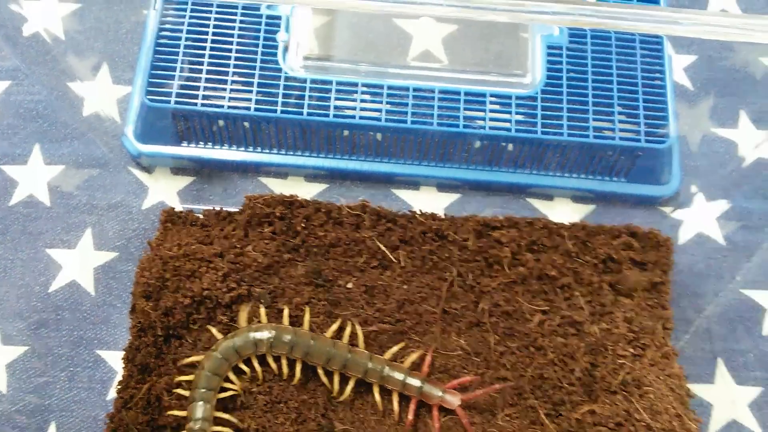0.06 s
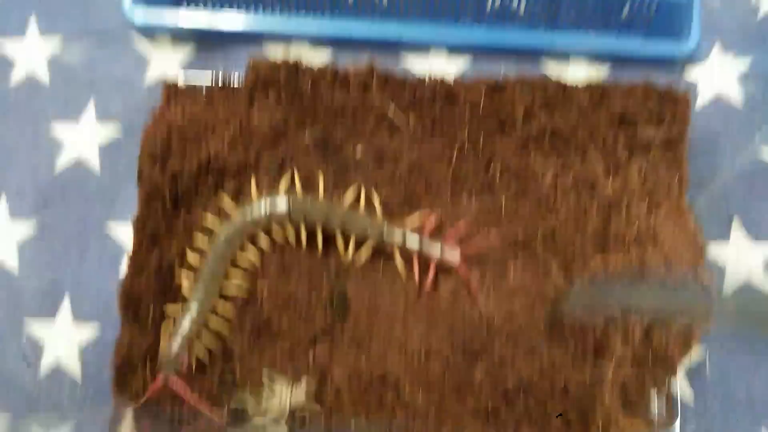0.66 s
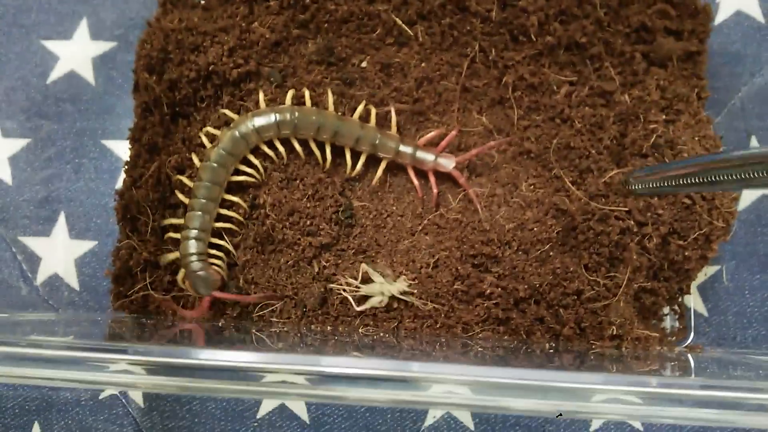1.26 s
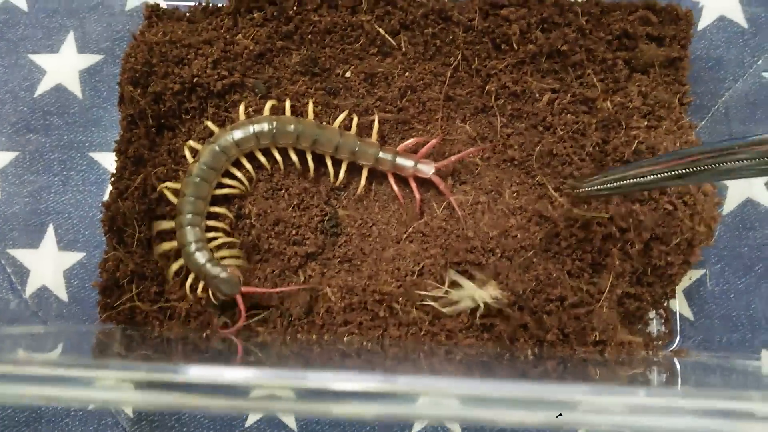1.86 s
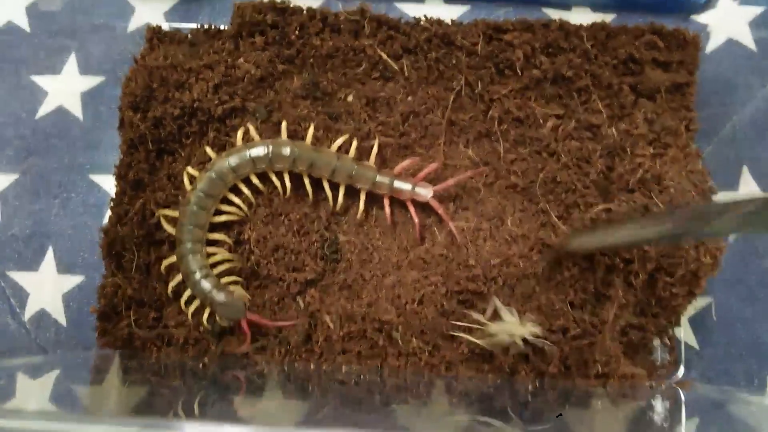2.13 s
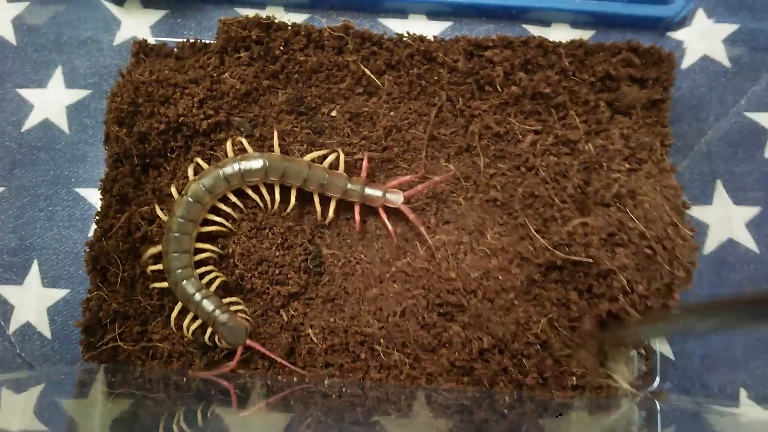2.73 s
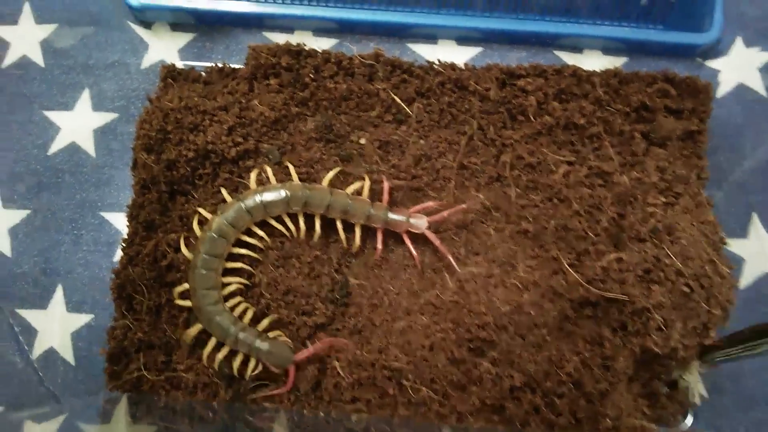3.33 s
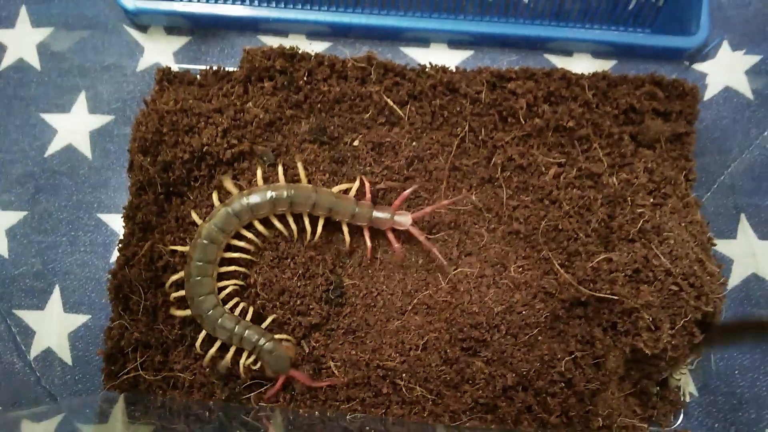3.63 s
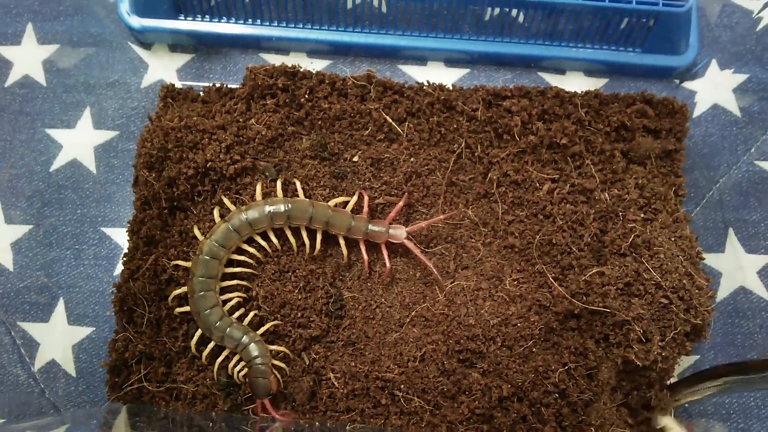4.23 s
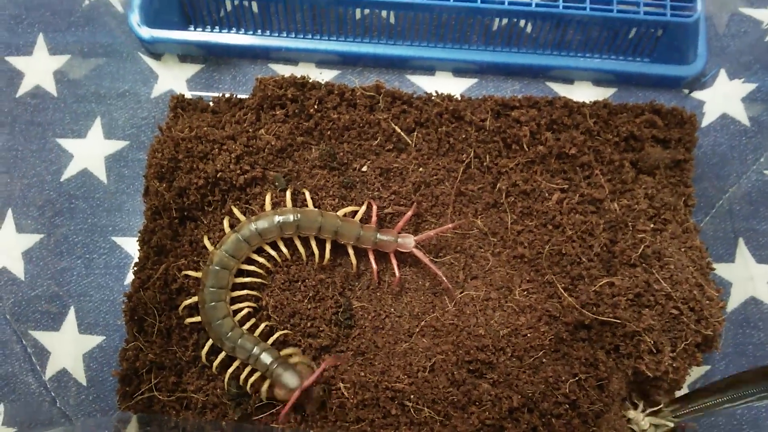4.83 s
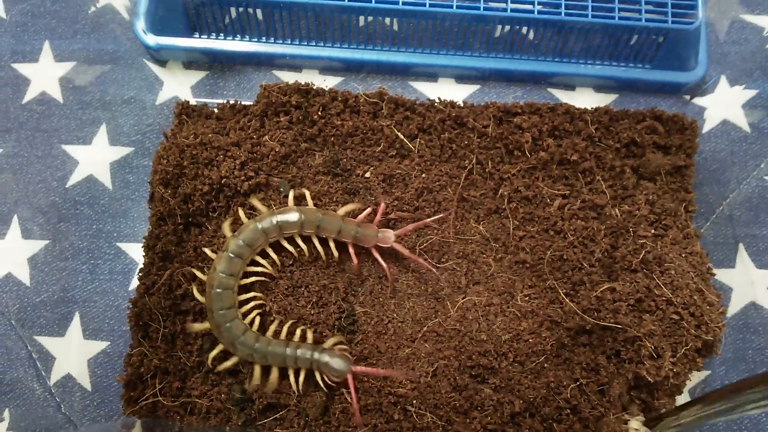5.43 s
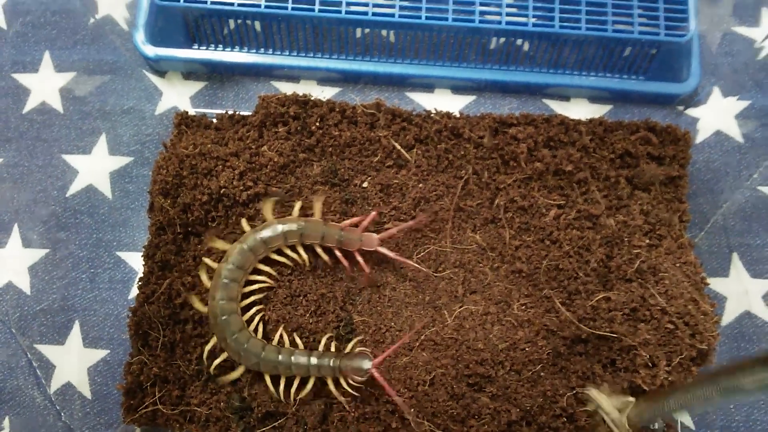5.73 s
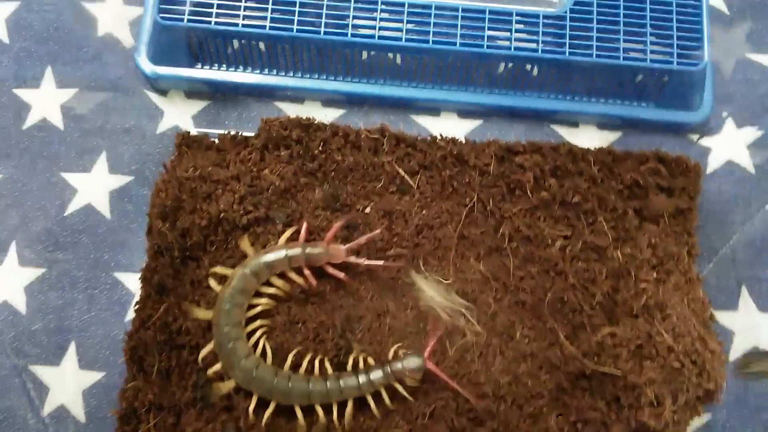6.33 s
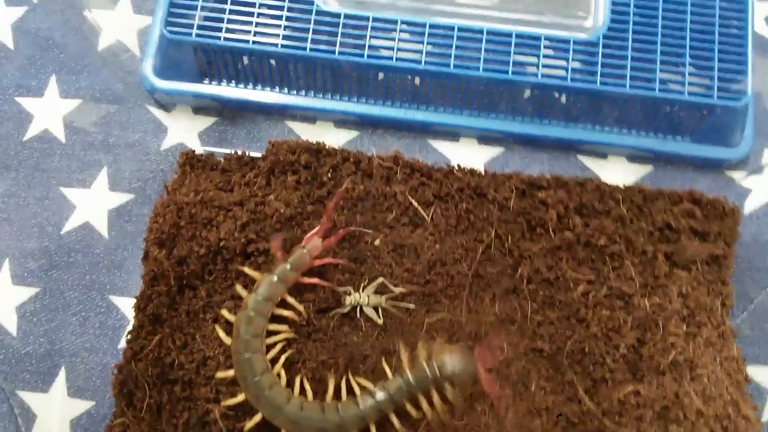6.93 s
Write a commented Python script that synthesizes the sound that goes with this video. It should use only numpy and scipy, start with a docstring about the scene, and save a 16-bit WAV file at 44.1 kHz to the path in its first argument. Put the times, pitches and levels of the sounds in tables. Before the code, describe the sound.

Close to the microphone in a small room, soft handling rumble and a few dull scuffs come first. Long steel tongs then knock three times on a thin plastic tub, each blow ringing briefly and hollowly. They scrape and tick along the wall and tap twice lightly. After a pause they hit the rim hard and bounce in a quick rattle. A faint low hum and hiss lie underneath.

```python
"""Long steel tongs chase a cricket into the corner of a thin plastic tub lined with soil, close to the
microphone in a small room. Each blow rings the plastic, among short scrapes, ticks and buzzes.
The tongs knock, judder along the wall, tap twice, then strike the rim and bounce ever faster as they
are drawn out. Underneath lie soft handling rumble, room noise with faint hollow tones,
a few scuffs further off, a low hum and faint hiss that wells up after sharp sounds."""
import sys
import numpy as np
from scipy import signal
from scipy.fft import rfft, irfft, next_fast_len
from scipy.io import wavfile
from scipy.ndimage import uniform_filter1d, map_coordinates

SR = 44100
rng = np.random.default_rng(int(sys.argv[2]) if len(sys.argv) > 2 else 0)


def generate_wav(sig):
    """Save sig (samples, or channels by samples) to the path in sys.argv[1] as 16-bit PCM at SR."""
    pcm = np.round(np.clip(np.atleast_2d(sig).T, -1, 1) * 32767).astype(np.int16)
    wavfile.write(sys.argv[1], SR, pcm)


N = 317079

# Handling rumble and room noise over time. Each row: time in seconds, relative level in dB.
RUMBLE_LEVELS = [(0, -56), (0.6, -59), (2.8, -56.5), (4.7, -59.5), (5.05, -64), (6.15, -71), (6.55, -66),
                 (7.19, -68.5)]
AIR_LEVELS = [(0, -60), (1.5, -66.5), (2.4, -65), (4.5, -63.5), (5.1, -71.5), (7.19, -69)]
# The hand shifts its grip. Each row: middle in seconds, length in seconds, relative level in dB.
GRIP_SHIFTS = [(0.22, .35, -55), (0.62, .1, -54), (1.47, .2, -54), (1.87, .1, -53), (2.36, .1, -56),
               (5.82, .35, -62)]
# Colours of the noises. Each row: frequency in Hz, relative density in dB.
RUMBLE_SPECTRUM = [(20, -27), (50, -23), (100, -17.5), (130, 0.5), (175, -6), (230, -8.5), (320, -16.5),
                   (500, -42), (1000, -49)]
AIR_SPECTRUM = [(150, -10.5), (330, -0.5), (500, -0.5), (750, -4), (920, -1), (1150, -11.5), (2000, -22.5),
                (3500, -29.5), (8000, -42)]
HISS_SPECTRUM = [(300, -3), (2000, 3), (5000, -3.5), (8500, 1), (12000, -0.5), (15500, -7)]
SCUFF_SPECTRUM = [(300, -46), (750, -7), (950, 10), (1250, -0.5), (1600, 0), (2600, -5), (3500, -30),
                  (9000, -33)]
CRACK_SPECTRUM = [(40, -47), (100, -18), (170, -3), (330, -3), (750, -4), (1200, -4.5), (2200, -4),
                  (4500, 0), (8000, -3), (11000, -3.5), (16000, -8)]  # the tub's crowd of short, overlapping modes
# Decay of the crack and of the room. Each row: frequency in Hz, time to fall 60 dB in seconds.
CRACK_DECAY = [(200, 0.14), (1500, 0.11), (3500, .06), (7000, 0.031), (15000, .032)]
ROOM_DECAY = [(150, 0.33), (600, .32), (2000, .28), (4000, .24), (7000, 0.28), (12000, .45)]
# Narrow bands of noise. Each row: middle in seconds, length in seconds, pitch in Hz, level in dB.
HOLLOW_TONES = [(0.378, 0.36, 894, -60), (4.284, 0.61, 352, -56.5), (5.304, 0.44, 440, -68),
                (5.701, 0.65, 378, -66.5)]
# Scuffs further off. Each row: start in seconds, level in dB, time to fall 60 dB in seconds.
FAR_SCUFFS = [(0.942, -67, 1), (1.17, -65.5, .5), (1.44, -62.5, 1), (1.821, -43, 0.28),
              (6.725, -57.5, 0.25)]
# Modes of the tub. Each row: frequency in Hz, nominal time to fall 60 dB in seconds, then strength in dB
# when struck at each of the PLACES.
TUB_MODES = [(201.6, 0.14, -40, -39, -28, -28), (219.4, 0.24, -27.5, -24, -42, -31.5),
             (267, 0.16, -31.5, -53, -37, -38), (310, 0.13, -34.5, -62, -37.5, -38.5),
             (406, 0.22, -28.5, -45, -29.5, -25.5), (430.6, 0.3, -21, -20, -34.5, -34.5),
             (479.4, 0.08, -20, -12, -21.5, -29.5), (517, 0.18, -30.5, -17.5, -18.5, -40.5),
             (564.5, 0.14, -25, -19.5, -32.5, -23), (633.6, 0.14, -22, -43, -36, -21),
             (685.5, 0.15, -28, -23.5, -24, -28.5), (895, 0.24, -37.5, -24, -16.5, -25),
             (966, 0.053, -10.5, -20, -31, -11), (981, 0.19, -28.5, -29, -27, -18.5),
             (1040, 0.11, -27.5, -46, -16.5, -28), (1160, 0.12, -27, -21.5, -33, -28),
             (1255, 0.13, -40, -26, -24, -41), (1613, 0.085, -22, -22, -32, -36.5),
             (1736, 0.119, -29.5, -23.5, -26, -28.5), (1885, 0.058, -25.5, -37, -27, -34),
             (2026, 0.078, -37, -35, -27.5, -33.5), (2250, 0.09, -25, -21, -30.5, -25.5),
             (2393, 0.07, -24, -40, -21, -22.5), (3077, 0.1, -27, -29, -31.5, -36.5),
             (3530, 0.032, -26.5, -39, -35, -24.5), (3740, 0.094, -24.5, -38, -29, -17),
             (4700, 0.033, -38.5, -43.5, -29, -29.5), (5070, 0.03, -28, -40, -29.5, -31.5),
             (5527, 0.05, -23, -39, -34.5, -28), (6430, 0.022, -42.5, -39, -30.5, -36.5),
             (8347, 0.041, -44.5, -27, -35.5, -18.5)]
PLACES = ["wall", "bottom", "corner", "rim"]
# Tongs strike the tub. Each row: start in seconds, place, relative level in dB, treble cutoff in Hz,
# extra crack in dB, ring length factor, seconds to the first rebound (0 for none), dB change per rebound.
TONG_BLOWS = [(2.654, "wall", 3, 4530, -1.5, 0.72, .008, -3),
              (2.9715, "bottom", -7.5, 2200, -0.5, 0.75, 0, 0.00022),
              (3.4976, "corner", 0.8, 15050, 3.5, 1.05, 0, 0),
              (4.702, "corner", -28, 1200, 1, 0.82, .017, -2),
              (4.7914, "corner", -19.5, 3100, 4.5, 0.6, .019, -2),
              (6.417, "rim", 5.3, 8990, -0.3, 0.5, .0316, -5),
              (6.526, "rim", -16, 1000, 2.5, .3, 0, 0.00034)]
# Short scrapes, thin ticks of the steel tips, and brief buzzes after blows. Each row: start in seconds,
# length in seconds, relative level in dB, bass cutoff in Hz, treble cutoff in Hz.
SCRAPES_AND_TICKS = [(2.712, .058, -43, 300, 1400), (3.822, 0.025, -47.5, 250, 2400),
                     (3.872, .021, -36.5, 550, 6800), (3.962, 0.035, -42, 220, 4300),
                     (4.02, .06, -37.5, 560, 2900), (4.171, .006, -53, 400, 2000),
                     (4.218, 0.0087, -50.5, 5850, 14800), (4.276, .01, -57, 700, 2000),
                     (4.314, 0.0097, -55.5, 6000, 14000), (4.326, 0.0071, -44.5, 683, 1200),
                     (4.344, .048, -52, 690, 1500), (4.703, .022, -48.5, 500, 1300),
                     (6.492, .022, -34, 500, 1000)]
# Resonances of the tongs pressed on plastic. Each row: frequency in Hz, width in Hz, strength in dB.
TONG_MODES = [(445.3, 30, 6), (990, 37, 1), (1210, 74, -9.5), (1460, 37, -5.5), (1690, 58, 1),
              (1956, 52, 1.5), (2300, 130, -2.5), (2930, 180, -11.5), (3560, 81, -8.5), (3920, 140, -8.5),
              (4410, 85, -8.5), (5257, 62, -1.5), (7300, 300, -14), (9000, 160, -10), (10800, 900, -17),
              (14000, 2000, -20.5)]


def amp(db):
    """Decibels to gain."""
    return 10 ** (np.asarray(db) / 20)


def unit(x):
    """Scale to rms 1."""
    return x / np.sqrt(np.mean(x ** 2) + 1e-20)


def along(points, hz):
    """Read (Hz, value) points on a log frequency axis."""
    f, v = np.transpose(points)
    return np.interp(np.log(hz + 1), np.log(f + 1), v)


def curve(points):
    """Read (seconds, value) points at every sample."""
    return np.interp(np.arange(N) / SR, *np.transpose(points))


def wobble(rate):
    """A smooth random curve, rate knots a second."""
    return map_coordinates(rng.standard_normal(int(N * rate / SR) + 4), [np.arange(N) * rate / SR])


def arch(middle_s, length_s):
    """A swell from 0 to 1 and back."""
    return np.cos(np.pi * np.clip((np.arange(N) / SR - middle_s) / length_s, -.5, .5))


def filtered(x, response):
    """Shape x by a gain that depends on frequency."""
    size = next_fast_len(len(x) + SR // 4)
    return irfft(rfft(x, size) * response(np.fft.rfftfreq(size, 1 / SR)), size)[:len(x)]


def lowpass(hz, cutoff_hz, slope=0.96):
    """Treble roll-off; a softer contact lasts longer and so has a lower cutoff."""
    return (1 + (hz / cutoff_hz) ** 2) ** -slope


def noise(spectrum, size=N):
    """Coloured noise of rms 1."""
    return unit(filtered(rng.standard_normal(size), lambda hz: amp(along(spectrum, hz))))


def dying(x, decay):
    """Let each frequency of x die at its own speed."""
    hz, t, bands = signal.stft(x, SR, nperseg=128)
    fade = amp(-60 * t / along(decay, hz)[:, None])
    return signal.istft(bands * fade, SR, nperseg=128)[1][:len(x)]


def add(track, start_s, sound):
    """Mix a sound into the track."""
    part = track[round(start_s * SR):][:len(sound)]
    part += sound[:len(part)]


def handling_rumble(gain_db=0.5, lumps_db=1.8, lumps_per_s=9):
    """Lumpy low rumble that swells when the hand shifts its grip."""
    holding = amp(curve(RUMBLE_LEVELS) + lumps_db * wobble(lumps_per_s))
    shifting = sum(amp(db) * arch(middle_s, length_s) for middle_s, length_s, db in GRIP_SHIFTS)
    return amp(gain_db) * (holding + shifting) * noise(RUMBLE_SPECTRUM)


def room_air(gain_db=1.0):
    """The room's own noise, drifting slowly in level."""
    return amp(curve(AIR_LEVELS) + gain_db) * noise(AIR_SPECTRUM)


def hum(rest_hz=70.6, rest_db=-70.5, rise_hz=10, rise_db=9.5, middle_s=2.6, length_s=2.2):
    """A low wavering hum that grows higher and louder once, then settles."""
    swell = np.exp(-(2 * (np.arange(N) / SR - middle_s) / length_s) ** 6)
    hz = rest_hz + rise_hz * swell + 1.9 * wobble(rate=12)
    db = rest_db + rise_db * swell + 2.5 * wobble(rate=6.8)
    return amp(db) * unit(np.sin(2 * np.pi * np.cumsum(hz) / SR))


def hiss(sound, rest_db=-72.5, lift_db=13, release_s=0.18, threshold_db=-60):
    """Hiss wells up whenever the sound's treble passes a threshold, then sinks back."""
    treble = filtered(sound, lambda hz: 1 - lowpass(hz, cutoff_hz=4000))
    power = np.abs(uniform_filter1d(treble ** 2, size=256)) + 1e-20
    log_opening = np.log(power / (power + amp(threshold_db) ** 2))
    fall = np.arange(N) / SR / release_s
    held = np.exp(np.maximum.accumulate(log_opening + fall) - fall)  # opens at once, closes slowly
    return amp(rest_db + lift_db * held) * noise(HISS_SPECTRUM)


def hollow_tones(width_hz=24):
    """Faint narrow bands of noise come and go in the room."""
    out = np.zeros(N)
    for middle_s, length_s, hz, db in HOLLOW_TONES:
        band = filtered(rng.standard_normal(N), lambda f: 1 / (1 + ((f - hz) / width_hz) ** 2))
        out += amp(db) * arch(middle_s, length_s) * unit(band)
    return out


def scuffs(rise_s=.024):
    """Dull brushing sounds swell and fade, further from the microphone."""
    out, t = np.zeros(N), np.arange(SR // 2) / SR
    swell = 1 - np.exp(-(t / rise_s) ** 2)
    for start_s, db, t60 in FAR_SCUFFS:
        add(out, start_s, noise(SCUFF_SPECTRUM, len(t)) * swell * amp(db - 60 * t / t60))
    return out


def tong_contacts(count=6, shrink=.67, soften=.64, damp=.87):
    """The springy tongs rebound: each contact comes sooner, is weaker and softer, and damps the tub more."""
    for start_s, place, db, cutoff_hz, hard_db, ring_factor, flight_s, step_db in TONG_BLOWS:
        for k in range(count if flight_s > 0 else 1):
            yield start_s, place, db + k * step_db, cutoff_hz * soften ** k, hard_db, ring_factor * damp ** k
            start_s += flight_s * shrink ** k


def tub_knocks(ring_db=-1, crack_db=-14, push_db=-9, scatter_db=1.5,
               push_s=0.00021, crack_rise_s=.0004, spread_s=0.00088):
    """Each blow shoves the wall and rings the modes that the struck place favours, under a short crack."""
    out, t = np.zeros(N), np.arange(SR // 2) / SR
    hz, t60, *place_db = np.transpose(TUB_MODES)[:, :, None]
    t60 = np.minimum(t60, along([(2000, .35), (3600, .05)], hz))  # plastic soaks up treble
    push_time = (t - .0012) / push_s
    push = -(1 - 2 * push_time ** 2) * np.exp(-push_time ** 2)  # the wall gives way and springs back
    for start_s, place, db, cutoff_hz, hard_db, ring_factor in tong_contacts():
        mode_db = place_db[PLACES.index(place)] + scatter_db * rng.standard_normal(hz.shape)
        swings = np.sin(2 * np.pi * (hz * t + rng.random(hz.shape)))
        fades = amp(mode_db - 60 * t / (t60 * ring_factor))
        ring = np.sum(lowpass(hz, cutoff_hz) * swings * fades, axis=0)
        ring *= 1 - np.exp(-t / spread_s)  # grows as bending waves spread over the walls
        crack = dying(noise(CRACK_SPECTRUM, len(t)), CRACK_DECAY) * (1 - np.exp(-t / crack_rise_s))
        impact = amp(crack_db + hard_db) * crack + amp(push_db) * push
        impact = filtered(impact, lambda f: lowpass(f, cutoff_hz))
        add(out, start_s, amp(db) * (impact + amp(ring_db) * ring))
    # cut the low thump below 120 Hz from the knocks
    return signal.sosfilt(signal.butter(2, 120, "high", fs=SR, output="sos"), out)


def scrapes_and_ticks(pulses_per_s=520, jitter=.25, uneven_db=3, grit=0.087, bite_share=0.111,
                      release_share=.33, detune=0.0068, scatter_db=2, broadband_db=-19):
    """Scrapes, ticks and buzzes: quick slips or contacts ring steel on plastic, never twice quite alike."""
    out, t = np.zeros(N), np.arange(SR // 4) / SR
    for start_s, length_s, db, bass_hz, treble_hz in SCRAPES_AND_TICKS:
        gap_draws, pulse_draws, pitch_draws, level_draws = rng.standard_normal((96, 4)).T
        gaps_s = np.exp(jitter * gap_draws) / pulses_per_s
        pulse_samples = ((np.cumsum(gaps_s) - gaps_s[0]) * SR).astype(int)
        pulses = np.bincount(pulse_samples, amp(uneven_db * pulse_draws), len(t))[:len(t)]
        bite = 1 - np.exp(-t / (bite_share * length_s))
        release = np.exp(-np.maximum(t - length_s, 0) / (release_share * length_s))
        force = bite * release * (pulses + grit * rng.standard_normal(len(t)))

        def response(f):
            """The tongs' resonances over a broadband floor, with bass and treble rolled off."""
            body = amp(broadband_db)
            for (hz, width, mode_db), pitch, level in zip(TONG_MODES, pitch_draws, level_draws):
                hz *= 1 + detune * pitch
                resonance = 1j * f * width / (hz ** 2 - f ** 2 + 1j * f * width)
                body = body + amp(mode_db + scatter_db * level) * resonance
            return body * lowpass(f, treble_hz) * (1j * f / (bass_hz + 1j * f)) ** 2

        add(out, start_s, amp(db) * unit(filtered(force, response)) * np.sqrt(length_s / t[-1]))
    return out


def room_tail(sound, wet_db=-15, treble_db=-4, build_s=0.01):
    """The furnished room answers with a short, weak tail."""
    t = np.arange(SR // 2) / SR
    tail = dying(rng.standard_normal(len(t)), ROOM_DECAY) * (1 - np.exp(-(t / build_s) ** 2))
    tail /= np.linalg.norm(tail)
    tail = filtered(tail, lambda hz: amp(along([(1500, 0.0024), (5000, treble_db)], hz)))
    return amp(wet_db) * signal.fftconvolve(sound, tail)[:N]


def scene():
    """Tongs and tub close to one microphone, with the small room behind them."""
    direct = tub_knocks() + scrapes_and_ticks() + scuffs()
    mix = direct + room_tail(direct) + handling_rumble() + room_air() + hum() + hiss(direct)
    return (mix + hollow_tones())[None]


def record(dry, ceiling=0.75, top_hz=15900):
    """The microphone rounds off the highest peaks and keeps nothing above its band limit."""
    rounded = dry[0] / (1 + (dry[0] / ceiling) ** 4) ** (1 / 4)
    return filtered(rounded, lambda hz: hz < top_hz)[None]


dry = scene()
out = record(dry)
generate_wav(out)
```